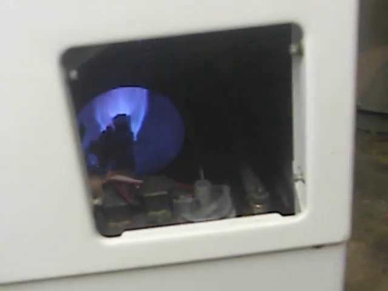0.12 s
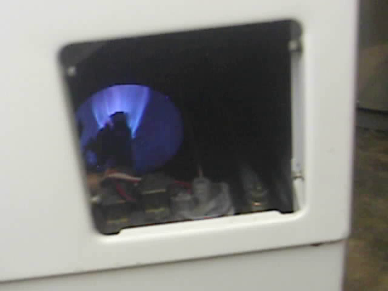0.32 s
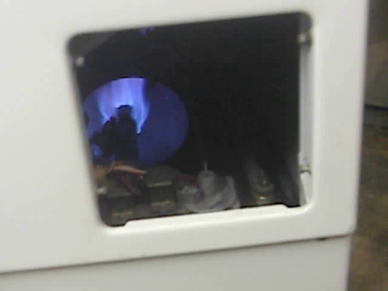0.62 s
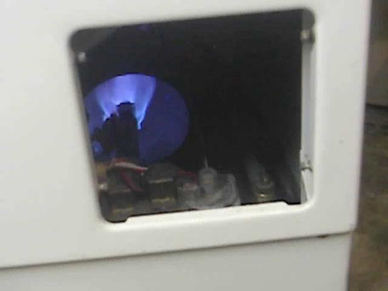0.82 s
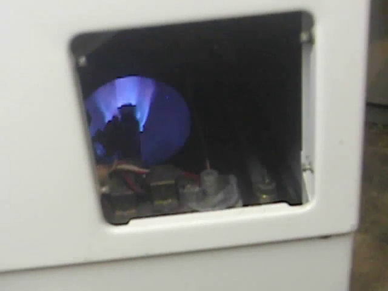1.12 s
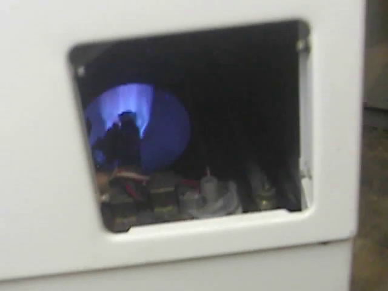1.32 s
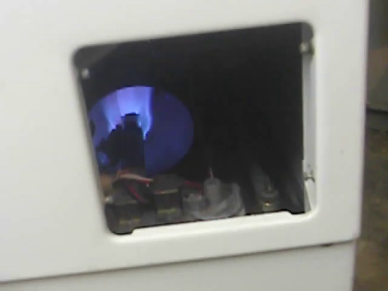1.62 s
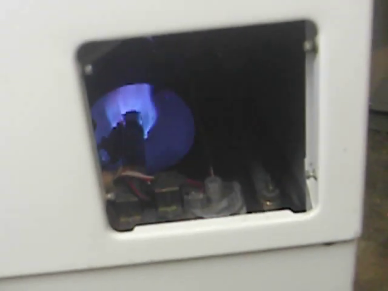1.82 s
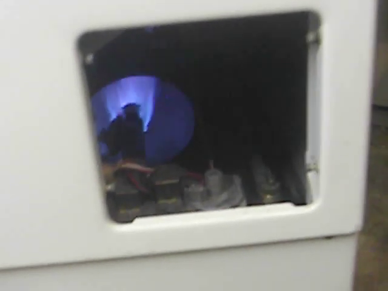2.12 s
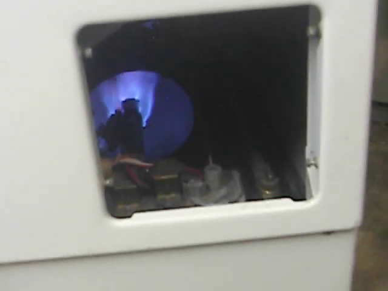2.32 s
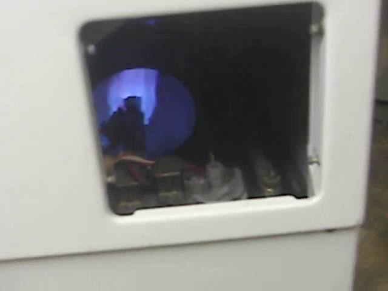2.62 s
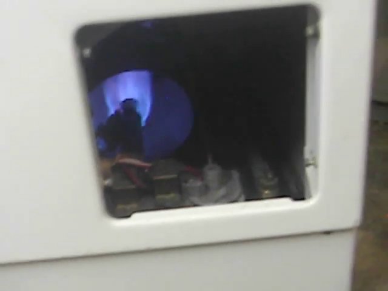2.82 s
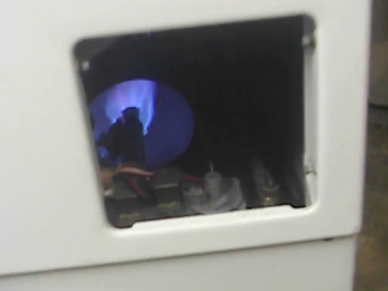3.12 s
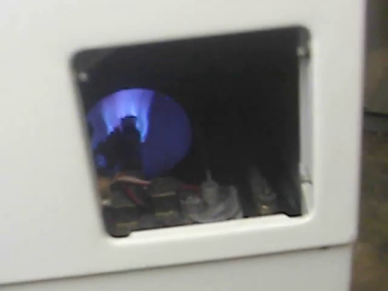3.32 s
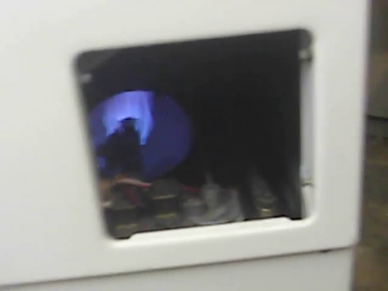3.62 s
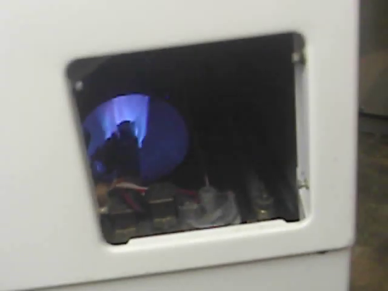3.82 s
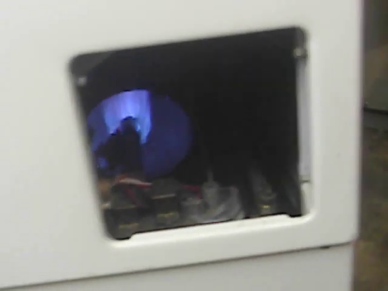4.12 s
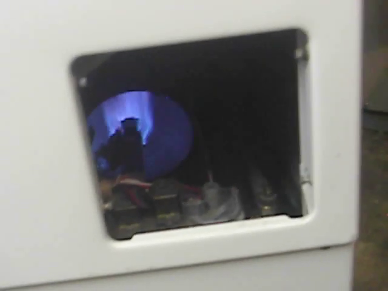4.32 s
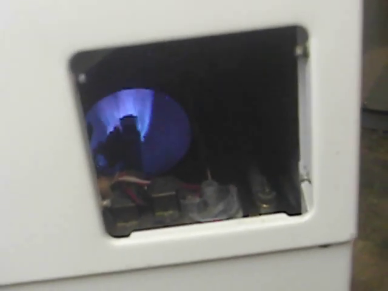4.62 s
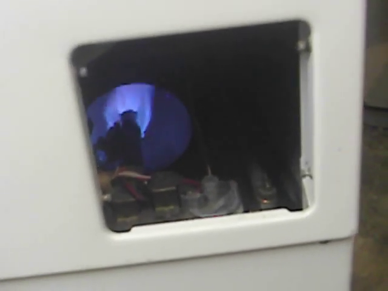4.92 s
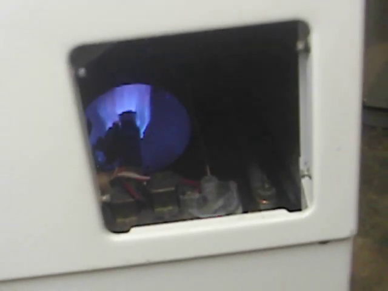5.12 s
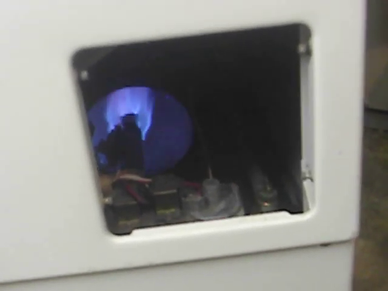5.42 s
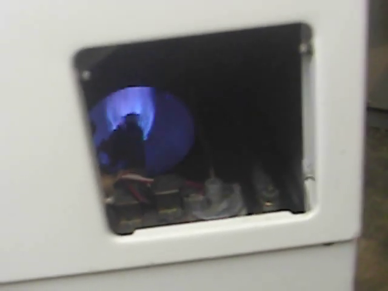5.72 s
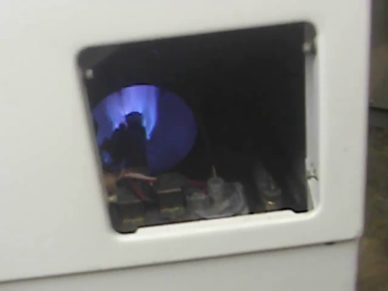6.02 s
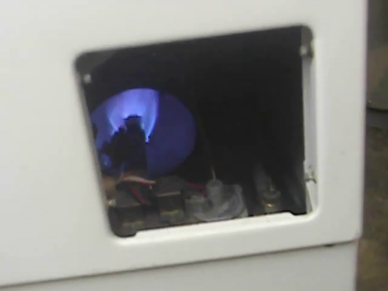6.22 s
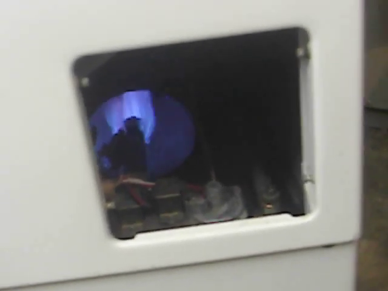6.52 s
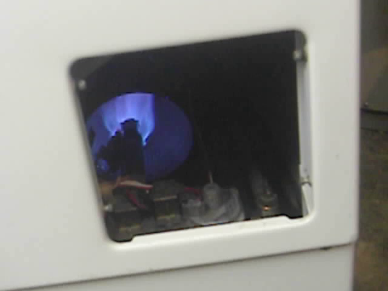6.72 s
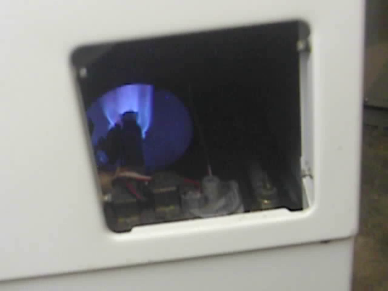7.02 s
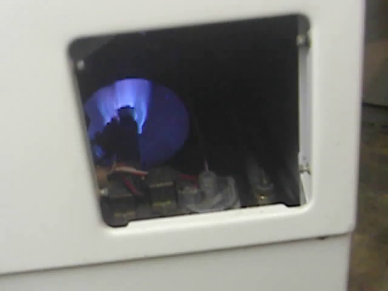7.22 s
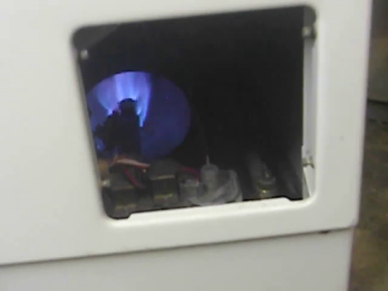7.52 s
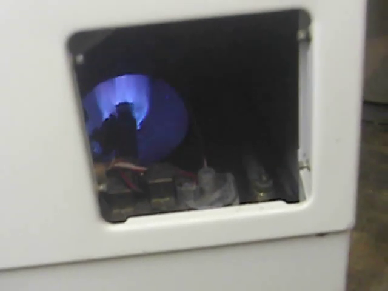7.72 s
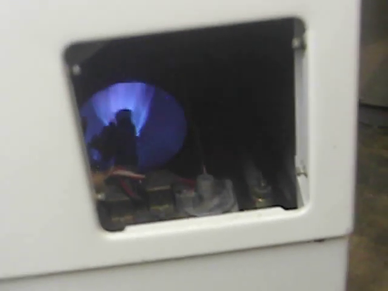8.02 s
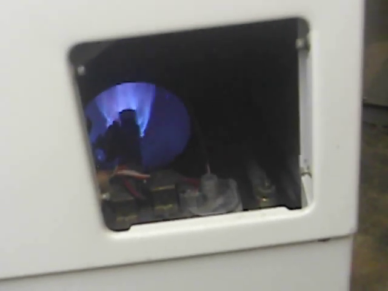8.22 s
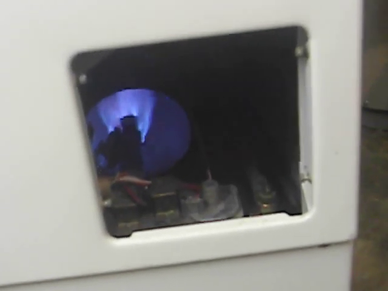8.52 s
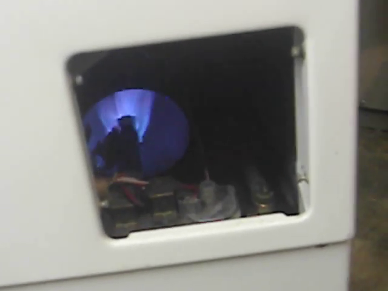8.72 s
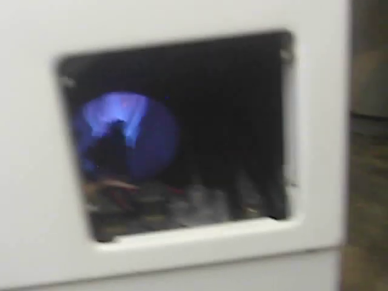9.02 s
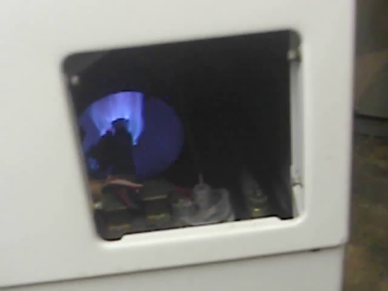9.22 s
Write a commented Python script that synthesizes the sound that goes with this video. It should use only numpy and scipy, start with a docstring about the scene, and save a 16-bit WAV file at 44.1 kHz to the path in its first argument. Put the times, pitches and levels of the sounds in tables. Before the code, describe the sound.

From 0 to about 9.3 seconds a gas clothes dryer runs continuously, heard close at its open burner hatch in mono. A broad, low flame-and-air roar flutters and gusts, its bass filling out slightly over the first seconds. Beneath it sit steady mains hum, belt and roller drone; a hollow blower tone surges irregularly, strongest near 2.6, and a thin high whine stays faint. The drum rubs its felt seal with a mid-pitched groan and hiss, repeating uneven pulses every 1.2 seconds. Faint metallic patter runs throughout. A small tick and scrape comes at 1.8, a rougher clatter at 2.9-3.0, light taps at 4.9 and 5.5, a clearer one at 6.75, then several from 7.2 to 8.2. The hardest, bright clank rings at 8.3, with a weak tick at 9.1. Treble is sharply dulled, except for tiny dry crackles. The machine never stops.

```python
"""A broad roar and a low drone fill the open inspection hatch of a gas clothes dryer with its burner lit.
Roar and blower are shaped noise; motor, drum rollers and a thin whine are stacks of sines.
The drum rubs its felt seal in the same pattern on every turn: noise through panel and drum resonances.
Now and then a fastener in the load scrapes or ticks on the steel, as short bursts that make the drum ring.
Brief crackles sit on top in the treble."""
import sys
import numpy as np
from scipy import signal
from scipy.fft import rfft, irfft, next_fast_len
from scipy.io import wavfile

SR = 44100
rng = np.random.default_rng(int(sys.argv[2]) if len(sys.argv) > 2 else 0)


def int16_out(signal):
    """Quantize to a 16-bit WAV file."""
    q = np.round(np.clip(np.atleast_2d(signal).T, -1, 1) * 32767)
    wavfile.write(sys.argv[1], SR, q.astype(np.int16))


N = 411894

# magnetic hum of the motor: (multiple of the mains, level [dB])
MOTOR_HUM = [(2, -22), (4, -27.5), (6, -42.5)]
# tones of fan, belt and pulleys: (frequency [Hz], level [dB], phase wander [rad])
BELT_TONES = [(99.8, -32, 0.6), (143.6, -32, 0.8), (149.5, -30.5, 0.22), (176.2, -31.5, 0.7),
              (210.6, -27, 0.24), (298.5, -36, 0.84), (447.5, -49, 1), (556, -43, 0.63), (575, -40, .9),
              (579.5, -43, 0.78), (591, -40.5, 0.36), (838, -45, 2), (1223, -48, 1.4)]
# thrum of a support roller: (multiple of its turning rate, level [dB])
ROLLER_THRUM = [(8, -49), (10, -40), (11, -38), (12, -44), (13, -45.5), (15, -32.5), (16, -34), (18, -41.5),
                (19, -45.5), (22, -37.5), (27, -40), (30, -35.5), (31, -35), (32, -37.5), (40, -39)]
# roar of flame and moving air, before the ducts colour it: (frequency [Hz], level [dB per Hz])
FLAME_ROAR = [(18, -61.5), (42, -59.5), (62, -55), (85, -48), (130, -41), (160, -49.5), (230, -46.5),
              (300, -44.5), (370, -52.5), (650, -53), (760, -57), (1500, -62.5), (2800, -64.5),
              (4100, -69.5)]
# resonances and notches of burner tube and cabinet: (frequency [Hz], width [Hz], lift [dB])
DUCT_COLOUR = [(103.5, 12, 5.5), (129, 7.2, -5), (160, 6.7, -3), (183.5, 20, 10), (204, 4.6, -4.5),
               (222.5, 14, 6), (409, 10, -3.5), (417, 8.2, 3), (523, 45, -1), (842, 40, 4), (893, 30, 3.5),
               (977, 50, 4.5)]
# drone of the blower housing: (time [s], level before trim and surges [dB])
BLOWER_LEVEL = [(0, -28), (2.6, -24.5), (5.5, -28), (6.5, -28), (8, -27.5), (9.34, -26.5)]
# resonances of the blower housing: (frequency [Hz], width [Hz], relative level [dB])
HOUSING_MODES = [(570, 55, 0.5), (618, 77, -7.5), (650, 35, -9)]
# panel resonances driven by the rubbing: (frequency [Hz], width [Hz], relative level [dB])
PANEL_MODES = [(1108, 42, 2.5), (1199, 62, 5), (1263, 18, 3), (1388, 80, 0.5)]
# modes of the steel drum: (frequency [Hz], width [Hz], relative level [dB])
DRUM_MODES = [(1708, 160, -2), (1964, 45, -1), (2116, 160, -5), (2330, 190, -2.5), (2600, 130, -8),
              (3120, 320, -.5), (3348, 80, 1.5), (3463, 71, -.5), (3700, 220, -2.5), (3976, 130, -5)]
# high spots pressing on the seal once a turn, the seam hardest: (time into the turn [s], added pressure [dB])
SEAL_HIGH_SPOTS = [(.045, 3), (.17, 0.1), (.295, 5.5), (.56, -0.5), (.64, 2), (1.08, 4)]
# hiss of felt and cloth sliding on steel: (time [s], level before trim and pressure [dB])
SLIDE_LEVEL = [(0, -27), (2.3, -26.5), (5.6, -27), (7.3, -25.5), (8.4, -25.5), (9.34, -26.5)]
# fasteners tapping the drum: (time [s], level before trim [dB], colour centre [Hz], colour spread [octaves])
FASTENER_TAPS = [(1.825, -16, 3380, .35), (1.833, -18, 2970, 0.46), (1.839, -18, 2450, 0.31),
                 (2.909, -11, 2613, 0.77), (2.915, -11, 3400, 0.56), (2.924, -9.5, 1498, .65),
                 (2.933, -16.5, 2160, .45), (2.943, -20.5, 2097, .25), (2.955, -17.5, 1550, .7),
                 (2.966, -17.5, 2100, .8), (2.976, -16, 1984, 0.22), (2.998, -23, 2210, .5),
                 (4.880, -20, 2690, .3), (5.542, -21, 2205, .3), (6.748, -13.5, 3430, .3),
                 (6.753, -17, 3060, 0.35), (6.84, -19.5, 3650, .2), (7.229, -19.5, 3300, 0.33),
                 (7.239, -21, 3410, .35), (7.684, -24.5, 3340, .25), (8.022, -17.5, 3300, .3),
                 (8.154, -23, 3340, .35), (8.327, -5, 3340, .17), (8.337, -11, 3480, .12),
                 (9.131, -22, 3710, .25)]
# fasteners skidding over the drum: (time [s], level before trim [dB], length [s], colour centre [Hz])
FASTENER_SKIDS = [(1.824, -21, .026, 2520), (2.899, -20, 0.045, 1944), (2.951, -20, 0.03, 1507),
                  (7.373, -22.5, 0.024, 2260), (8.32, -13, .016, 3010), (8.416, -22, 0.016, 2230)]
# ring of the drum after a blow: (frequency [Hz], relative level [dB], t60 [s])
DRUM_RING = [(1250, 3, .27), (1410, -5, .16), (1650, -5.5, .16), (2140, -3, .14), (2240, -3.5, .18),
             (2580, -4.5, .16), (2850, -3.5, .2), (3122, -5, .2), (3140, -2.5, .28), (3353, -4, 0.17),
             (3640, -1.5, .28), (3420, -4, .18), (3660, -5, .22)]
# thin, dry crackles in the treble: (time [s], level [dB], length [s], colour centre [Hz])
TREBLE_CRACKLES = [(2.179, -42, .0003, 6000), (2.911, -26.5, 0.00024, 6300), (2.936, -40, .0004, 4500),
                   (2.941, -44, .0004, 4200), (4.354, -44, 0.00033, 5000), (5.921, -50, .0003, 4500),
                   (7.070, -46, 0.00028, 4800), (7.522, -43.5, .0003, 6000), (8.294, -37, .0003, 6000),
                   (8.329, -26, 0.0013, 7200)]

MAINS_HZ, WHINE_HZ, ROLLER_HZ = 60, 1846, 7.085
TURN_S = 1.178  # one turn of the drum
PRESS_S, RELEASE_S = 0.029, 0.054  # a high spot meets the felt quickly and leaves it more slowly
TAP_S = 0.0037  # length of a tap
BOUNCE_S, BOUNCE_DB = 0.024, -14  # a fastener hops: time between its taps, and the loss at each
SKID_OCTAVES = 0.56  # spread of a skid's colour
BAND_HZ, TOP_HZ = 4060, 15800  # where the treble of the narrow band starts to fall; upper limit of all sound
LEAD = SR // 100  # samples of room for the soft edge of a burst

TIME = np.arange(N) / SR
SIZE = next_fast_len(N + SR // 2, real=True)
FREQ = np.maximum(np.arange(SIZE // 2 + 1) * SR / SIZE, 1)


def undb(db):
    """Decibels to gain."""
    return 10 ** (np.asarray(db) / 20)


def unit(x):
    """Scale to rms 1."""
    return x / np.sqrt(np.mean(x ** 2))


def curve(rows):
    """Join (time, value) rows by straight lines."""
    return np.interp(TIME, *np.transpose(rows))


def colour(x, gain):
    """Filter by a gain for each frequency."""
    return irfft(rfft(x, SIZE) * gain, SIZE)[:N]


def noise(gain):
    """Turbulence with the given amplitude per root Hz."""
    return colour(rng.standard_normal(N), gain) * np.sqrt(SR / 2)


def walk(rate_hz):
    """Slow random drift with rms 1."""
    return unit(noise(np.exp(-(FREQ / rate_hz) ** 2)))


def bell(hz, width_hz, freq=FREQ):
    """Power response of one resonance."""
    return 1 / (1 + ((freq / hz - hz / freq) * hz / width_hz) ** 2)


def body(modes, freq=FREQ):
    """Gain of a set of resonances with steep skirts."""
    # squaring the bell narrows it; the factor 1.5 brings the half-power width back near the listed one
    power = sum((undb(db) * bell(hz, 1.5 * width, freq)) ** 2 for hz, width, db in modes)
    return np.sqrt(power)


def drum_turn(at_s):
    """Time from the nearest passing of a point on the drum, negative before it."""
    return (TIME - at_s + TURN_S / 2) % TURN_S - TURN_S / 2


def short_burst(length_s, hz, octaves, strike=0.54):
    """One sharp impulse, then a short run of noise, coloured by a bell and the steel; rms 1 while it lasts."""
    t = np.arange(SR // 10) / SR
    grains = rng.standard_normal(len(t)) * np.exp(-(t / length_s) ** 4)
    grains[0] += strike * np.sqrt(min(length_s, TAP_S) * SR)
    freq = np.maximum(np.arange(len(t) // 2 + 1) * SR / len(t), 1)
    tint = np.exp(-.5 * (np.log2(freq / hz) / octaves) ** 2)
    # gain of drum and panel modes over a flat floor
    steel = body(DRUM_MODES, freq) + .5 * body(PANEL_MODES, freq) + 1.5
    burst = irfft(rfft(np.roll(grains, LEAD)) * tint * steel, len(t))
    return burst * np.sqrt(length_s * SR / np.sum(burst ** 2))


def place_bursts(events):
    """Lay bursts on the timeline from (time, level, length, colour centre, colour spread) rows."""
    out = np.zeros(N + SR)
    for s, db, length_s, hz, octaves in events:
        burst, start = short_burst(length_s, hz, octaves), int(s * SR)
        out[start:start + len(burst)] += undb(db) * burst
    return out[LEAD:LEAD + N]


def crackle(octaves=0.69):
    """Now and then the treble crackles for an instant: very short, thin, dry bursts of noise."""
    return place_bursts([(*row, octaves) for row in TREBLE_CRACKLES])


def whine(first_db=-46.0, second_db=-49.0, wander_rad=0.41):
    """A thin steady whine: a sine and its octave, with a slightly drifting phase."""
    angle = 2 * np.pi * WHINE_HZ * TIME + wander_rad * walk(2.4)
    return np.sqrt(2) * (undb(first_db) * np.sin(angle) + undb(second_db) * np.sin(2 * angle))


def roller(slip_rad=0.028):
    """Bumps on a worn roller come round on each of its turns and shake the cabinet."""
    angle = 2 * np.pi * ROLLER_HZ * TIME + slip_rad * walk(0.31)
    out = 0
    for k, db in ROLLER_THRUM:
        out = out + undb(db) * np.sin(k * angle + 2 * np.pi * rng.random())
    return np.sqrt(2) * out


def motor(hum_waver_db=1.65, wander_hz=1.5, tone_waver_db=1.06):
    """Magnetic hum keeps the pitch of the mains; tones of the belt-driven parts wander with the load."""
    out = 0
    for k, db in MOTOR_HUM:
        level = undb(db + hum_waver_db * walk(wander_hz))
        out = out + level * np.sin(2 * np.pi * (k * MAINS_HZ * TIME + rng.random()))
    for hz, db, wander_rad in BELT_TONES:
        drift = walk(wander_hz)  # moves level and phase together
        level = undb(db + tone_waver_db * drift)
        out = out + level * np.sin(2 * np.pi * (hz * TIME + rng.random()) + wander_rad * drift)
    return np.sqrt(2) * out


def blower(trim_db=-3.0, surge_db=2.2, surge_hz=8.0):
    """The housing drones; tumbling cloth chokes and frees the airflow at random."""
    drone = unit(noise(body(HOUSING_MODES)))
    return drone * undb(trim_db + curve(BLOWER_LEVEL) + surge_db * walk(surge_hz))


def pressure():
    """Pressure on the seal in dB: each high spot presses and lets go once a turn."""
    out = 0
    for at_s, db in SEAL_HIGH_SPOTS:
        since = drum_turn(at_s)
        out = out + db * np.exp(-(since / np.where(since < 0, PRESS_S, RELEASE_S)) ** 2)
    return out


def seal(panel_db=-32.0, hiss_db=-3.0, hiss_share=0.53, grain_db=2.0, grain_hz=70):
    """The turning drum rubs its felt: the panel groans and the steel hisses, both with the pressure."""
    pressure_db = pressure()
    groan = unit(noise(body(PANEL_MODES))) * undb(panel_db + pressure_db)
    hiss = unit(noise(body(DRUM_MODES)) * undb(grain_db * walk(grain_hz)))
    # the hiss follows only a share of the pressure
    return groan + hiss * undb(hiss_db + curve(SLIDE_LEVEL) + hiss_share * pressure_db)


def load(trim_db=-1.5, patter_db=-32, ring_db=-8, wash_db=-9, wash_t60_s=0.48, count=45):
    """Fasteners strike, hop and skid, a few clearly and many faintly; the steel rings, the cabinet washes."""
    patter = [(when * N / SR, patter_db + 6 * force, .004, 2200 + 1400 * hardness, .6)
              for when, force, hardness in rng.random((count, 3))]
    taps = [(s + hop * BOUNCE_S, db + hop * BOUNCE_DB, TAP_S, hz, octaves)
            for s, db, hz, octaves in FASTENER_TAPS for hop in range(3)]
    skids = [(*row, SKID_OCTAVES) for row in FASTENER_SKIDS]
    hits = place_bursts(taps + skids + patter)

    t = TIME[:SR // 2]
    ring = sum(undb(db - 60 * t / t60) * np.sin(2 * np.pi * hz * t) for hz, db, t60 in DRUM_RING)
    wash = noise(body(DRUM_MODES))[:len(t)] * undb(-60 * t / wash_t60_s)
    # ring and wash levels are relative to the hits
    ring_tail = undb(ring_db) * unit(signal.fftconvolve(hits, ring)[:N])
    wash_tail = undb(wash_db) * unit(signal.fftconvolve(hits, wash)[:N])
    return undb(trim_db) * (hits + np.std(hits) * (ring_tail + wash_tail))


def burner(flutter_db=.5, flutter_hz=14, rumble_hz=380, rumble_db=0.4, swell_db=0.3, fullest_s=0.91,
           start_db=-2.5, settle_s=2.5, gust_db=2.5, gust_hz=3.5):
    """Fluttering flame and draught roar through the ducts; the lows build up, gust and swell with each turn."""
    hz, db = np.transpose(FLAME_ROAR)
    shape_db = np.interp(np.log(FREQ), np.log(hz), db)
    shape_db = shape_db + sum(lift * bell(f, width) for f, width, lift in DUCT_COLOUR)
    roar = noise(undb(shape_db)) * undb(flutter_db * walk(flutter_hz))
    rumble = colour(roar, np.exp(-(FREQ / rumble_hz) ** 2))
    swell = swell_db * np.cos(2 * np.pi * drum_turn(fullest_s) / TURN_S)
    build_up = start_db * np.exp(-TIME / settle_s)
    return roar - rumble + rumble * undb(rumble_db + build_up + swell + gust_db * walk(gust_hz))


def scene():
    """All parts of the machine sound from the one hatch."""
    return (whine() + roller() + motor() + blower() + seal() + load() + burner())[None]


def record(dry):
    """A narrow band: treble is cut before and after the highest peaks clip; faint crackles lie on top."""
    half_cut = undb(-(np.maximum(FREQ - BAND_HZ, 0) / 33) ** 1.27 / 2)  # half of the cut on each pass
    clipped = np.clip(colour(dry[0], half_cut), -.72, .72)
    out = colour(clipped, half_cut) + crackle()
    top_cut = signal.ellip(8, .2, 70, TOP_HZ, fs=SR, output="sos")
    return signal.sosfilt(top_cut, out)[None]


dry = scene()
out = record(dry)
int16_out(out)
```